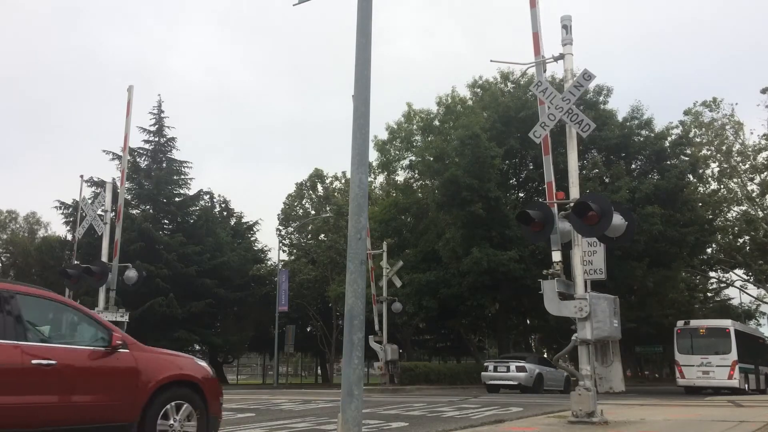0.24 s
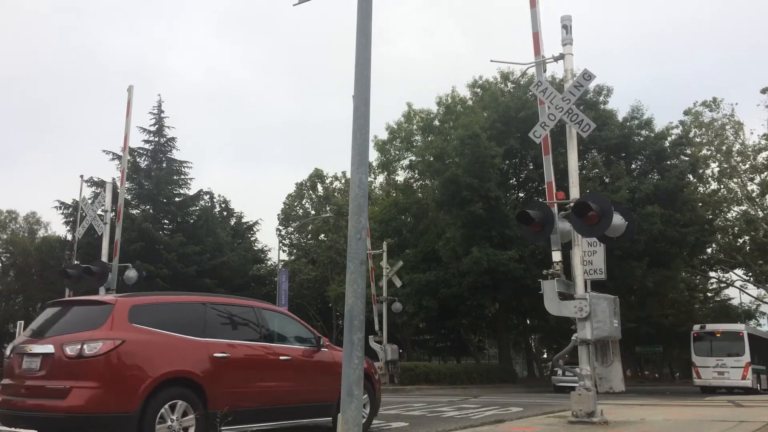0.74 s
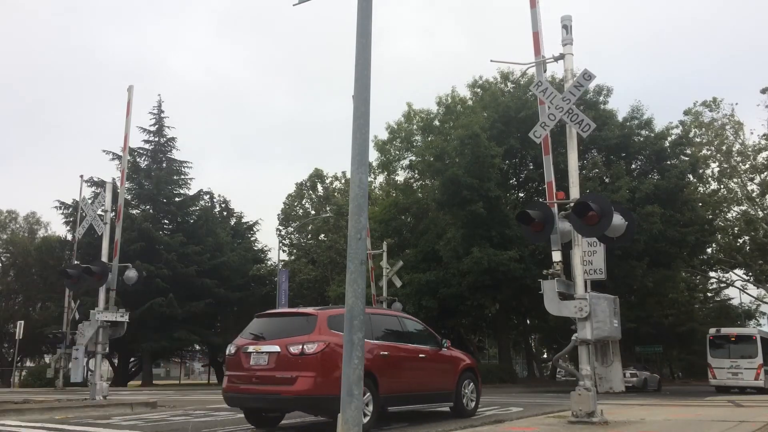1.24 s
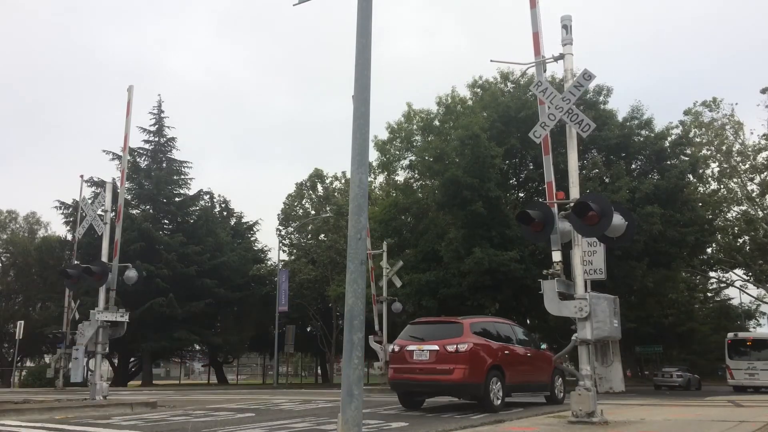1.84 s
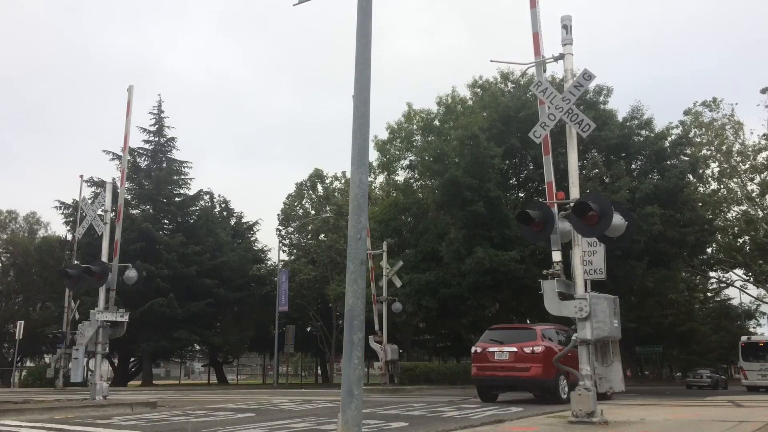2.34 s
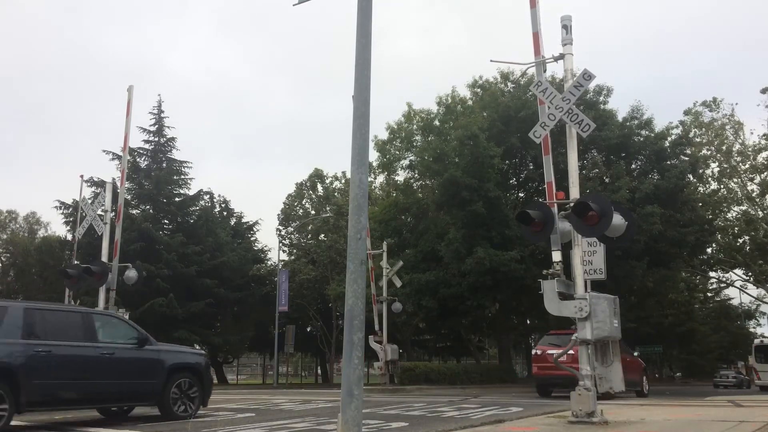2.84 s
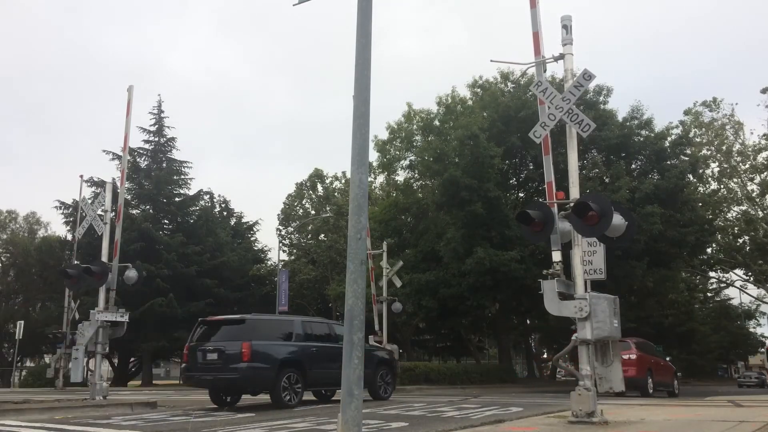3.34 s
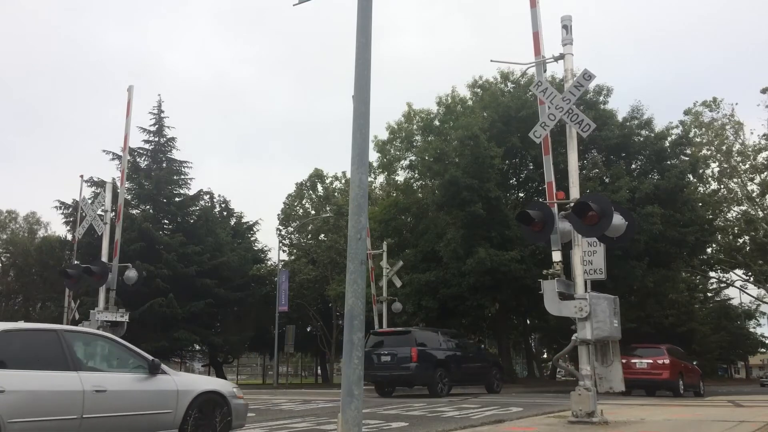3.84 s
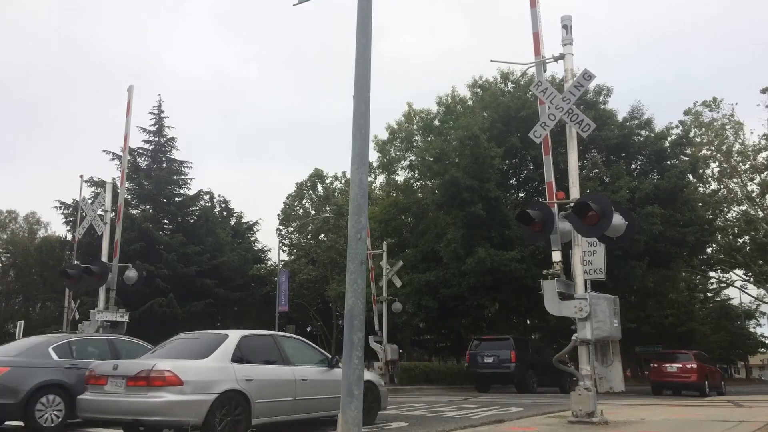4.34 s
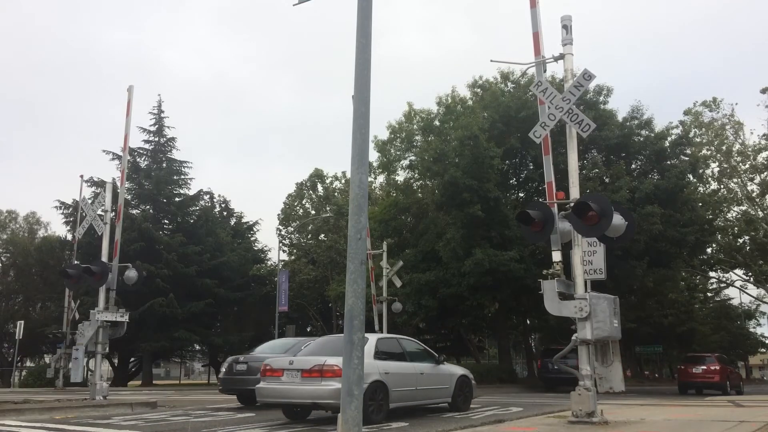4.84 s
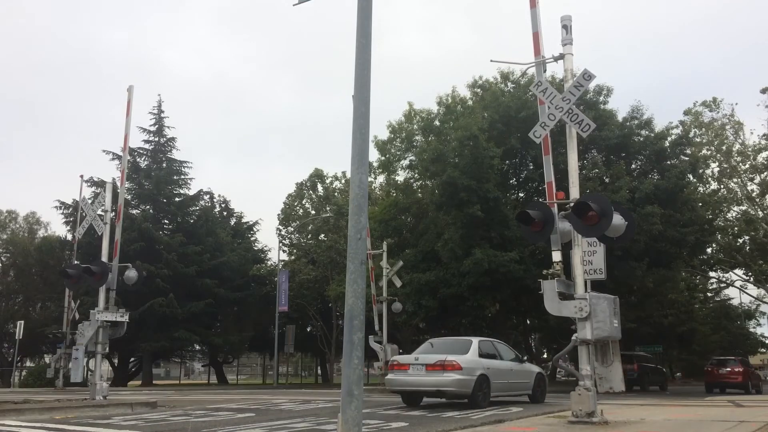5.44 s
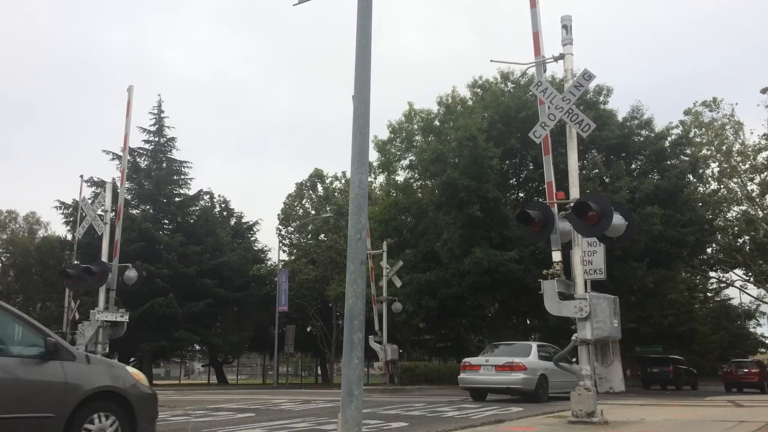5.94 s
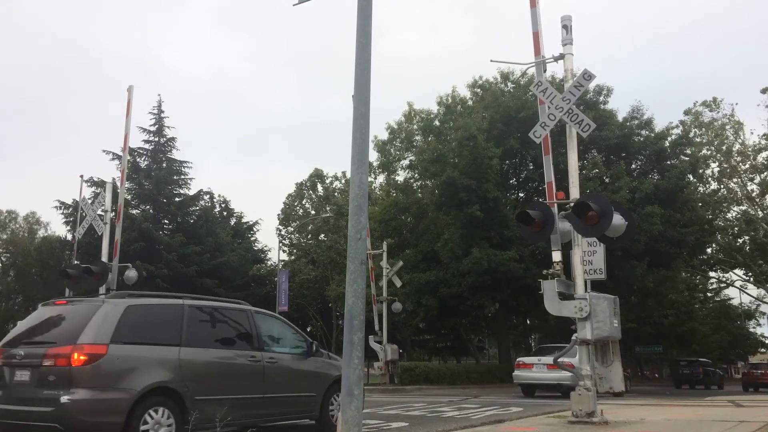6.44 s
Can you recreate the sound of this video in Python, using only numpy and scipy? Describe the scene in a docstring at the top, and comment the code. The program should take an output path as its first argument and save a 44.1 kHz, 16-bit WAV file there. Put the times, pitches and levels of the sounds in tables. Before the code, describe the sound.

Tyres roar and hiss over a low traffic rumble, picked up by a fixed mono microphone beside a town level crossing. A deep exhaust drone is loudest at first, then recedes while a quieter engine hums through a gear change. Midway, wheels bump across the rails in a cluster of dull thumps, knocks and metallic clanks as a car revs past. A few lighter bumps follow near the end.

```python
"""An eight-cylinder engine pulls away with a booming exhaust, heard at a level crossing on a town street.
A slower engine works through a gear change and a passing car revs up and eases off, each a tone at its
firing rate. Wheels thump on the rails, knock the crossing panels and shake loose metal. Behind them,
tyres roar and hiss on the road over the low rumble of traffic. One fixed microphone, mono."""
import sys
import numpy as np
from scipy import signal
from scipy.io import wavfile
from scipy.ndimage import uniform_filter1d

SR = 44100
rng = np.random.default_rng(int(sys.argv[2]) if len(sys.argv) > 2 else 0)


def to_wav(sig):
    """Store sig (one row per channel, or 1-D mono) as 16-bit WAV at the path in sys.argv[1].

    Samples outside -1..1 are clipped; the rate is SR.
    """
    pcm = np.clip(np.atleast_2d(sig), -1, 1) * 32767
    pcm = np.round(pcm).astype(np.int16)
    wavfile.write(sys.argv[1], SR, pcm.T)  # frames by channels


N = 295470


def gain_of(db):
    """Decibels to amplitude."""
    return 10 ** (np.asarray(db) / 20)


def unit_rms(x):
    """Scales to an rms of one."""
    return x / np.sqrt(np.mean(x ** 2) + 1e-20)


def curves(rows):
    """The columns after a table's time column, one value a sample."""
    times, *columns = np.transpose(rows)
    return [np.interp(np.arange(N) / SR, times, column) for column in columns]


def add(mix, start_s, sound):
    """Mixes a sound in at its start time."""
    part = mix[round(start_s * SR):][:len(sound)]
    part += sound[:len(part)]


def drift(rate_hz):
    """A slow random wander of rms one, up to the given rate."""
    knots = rng.standard_normal(1000)
    wander = np.interp(np.arange(N) * 2 * rate_hz / SR, np.arange(1000), knots)
    return unit_rms(uniform_filter1d(wander, int(SR / rate_hz / 2)))


def swell(middle_s, length_s):
    """A bell-shaped rise and fall."""
    return np.exp(-np.minimum(2 * abs(np.arange(N) / SR - middle_s) / length_s, 5) ** 2)


def band(x, hz, width_hz, second_width_hz=None):
    """Two resonances of gain one in series, equally wide unless a second width is given."""
    for width in (width_hz, second_width_hz or width_hz):
        x = signal.lfilter(*signal.iirpeak(hz, hz / width, SR), x)
    return x


# when the first, middle and last group of cars leads at the microphone: t/s
GROUP_TIMES = [0.96, 2.4, 6.4]
def traffic_noise(spectra, size, patchy_db, flicker_db):
    """Patchy, flickering noise of rms one; given several spectra, it glides from group to group."""
    frames, hz = 4 * N // size + 5, np.fft.rfftfreq(size, 1 / SR)
    real, imag, patches = rng.standard_normal((frames, len(hz), 3)).T
    patches = unit_rms(uniform_filter1d(uniform_filter1d(patches, 8, axis=0), 12, axis=1))
    flicker = unit_rms(uniform_filter1d(rng.standard_normal(frames), 5))
    t, power = np.arange(frames) * size / 4 / SR, 0
    for (knot_hz, db), lead in zip(map(np.transpose, spectra), np.eye(len(spectra))):
        colour = gain_of(2 * np.interp(np.log(hz + 1), np.log(knot_hz + 1), db, -120, -120))
        share = np.interp(t, GROUP_TIMES[:len(spectra)], lead)
        power = power + np.outer(colour / colour.mean(), share)
    bins = (real + 1j * imag) * np.sqrt(power) * gain_of(patchy_db * patches + flicker_db * flicker)
    return unit_rms(signal.istft(bins, nperseg=size, noverlap=3 * size // 4)[1][:N])


# the street at the microphone: t/s, tyre roar level/dB, tyre hiss level/dB, deep rumble level/dB
ROAD_LEVELS = [(0.0, -42, -65, -42.5), (0.26, -40.5, -61.5, -34), (0.55, -42, -62.5, -39.5),
               (0.9, -39, -59.5, -44), (1.17, -39, -59.5, -37.5), (2.33, -36, -57, -37.5),
               (2.8, -34, -56, -40), (3.6, -33.5, -56.5, -39), (3.8, -33.5, -56, -31),
               (4.22, -35, -59.5, -35), (4.66, -36.5, -59, -35), (4.93, -37, -60.5, -38),
               (5.4, -37.5, -59.5, -37), (5.76, -36.5, -59, -40), (6.1, -36, -58.5, -41),
               (6.4, -36.5, -58, -37), (6.7, -36, -59.5, -45)]
# body rumble above the tyre roar, for each group of cars: level/dB
BODY_ABOVE_ROAR = [4.5, 4.5, 5.5]
# spectra of the deep rumble and the body rumble: f/Hz, relative level/dB
DEEP_SPECTRUM = [(11, -58), (18, -31), (32, -15.5), (44, -7), (56, 0.5), (70, 4), (110, -9.5), (140, -36.5),
                 (240, -120)]
BODY_SPECTRUM = [(53, -34), (90, -1.5), (123, 3.5), (140, 0), (225, -2), (265, -6.5), (381, -14.5),
                 (432, -21), (480, -20.5), (620, -57), (1060, -120)]
# tyre spectra, one for each group of cars: f/Hz, relative level/dB
ROAR_SPECTRA = [
    [(240, -46), (400, -16), (434, -3), (545, -12), (591, -4), (749, -3), (874, -7), (964, -7),
     (1210, -12.5), (1550, -15), (2090, -22.5), (2800, -31), (3640, -52), (6160, -120)],
    [(240, -36), (400, -5.5), (519, -5), (606, -4.5), (737, 0.5), (925, -2.5), (1050, -6), (1380, -5.5),
     (1620, -7.5), (2120, -20), (2500, -20), (2800, -32), (3640, -58.5), (6160, -120)],
    [(240, -34.5), (400, -10), (430, -17.5), (511, -6.5), (668, -1.5), (839, 0), (1120, -2.5), (1280, -4),
     (1580, -6), (1940, -15.5), (2340, -17), (2800, -39.5), (3640, -60), (6160, -120)],
]
HISS_SPECTRA = [
    [(1530, -30.5), (2600, -3.5), (2930, -6.5), (3180, -7), (3330, -7.5), (3610, -3.5), (4100, -5.5),
     (4420, -4), (5090, -8), (5650, -17), (6760, -15), (9820, -22.5), (10500, -24.5), (15500, -32.5)],
    [(1530, -28.5), (2600, -7), (2930, -5.5), (3380, -3), (3780, -7.5), (4350, -7), (5820, -15.5),
     (8330, -22.5), (9250, -22.5), (10400, -29), (13600, -31.5), (15500, -41.5)],
    [(1530, -32), (2600, -3), (2800, -2), (3130, -3), (3830, -2), (4320, -5.5), (6420, -16), (15500, -27.5)],
]
def road():
    """The bed of the street: engines and bodies rumble, tyres roar and hiss as the cars go by."""
    roar_db, hiss_db, deep_db = curves(ROAD_LEVELS)
    body_db = roar_db + np.interp(np.arange(N) / SR, GROUP_TIMES, BODY_ABOVE_ROAR)
    deep = gain_of(deep_db) * traffic_noise([DEEP_SPECTRUM], size=4096, patchy_db=2, flicker_db=-1)
    body = gain_of(body_db) * traffic_noise([BODY_SPECTRUM], size=2048, patchy_db=0.5, flicker_db=1.67)
    roar = gain_of(roar_db) * traffic_noise(ROAR_SPECTRA, size=1024, patchy_db=0.89, flicker_db=0.42)
    hiss = gain_of(hiss_db) * traffic_noise(HISS_SPECTRA, size=512, patchy_db=0.9, flicker_db=0.56)
    return deep + body + roar + hiss


def grit(ticks_per_s=25):
    """Small stones tick under the tyres, a few louder than the rest."""
    strength = gain_of(4.5 * np.minimum(rng.exponential(1, N), 4))
    ticks = strength * (rng.random(N) < ticks_per_s / SR)
    return gain_of(-65.5) * band(ticks, hz=12500, width_hz=6000)


# faint squeaks and narrow swells in the treble: middle t/s, length/s, f/Hz, level/dB
SQUEAK_SWELLS = [(0.134, 0.37, 6580, -77), (0.803, .2, 6900, -81), (0.953, 0.028, 5266, -62.5),
                 (1.301, 0.51, 8230, -79.5), (1.448, 0.082, 3000, -59), (1.479, 0.058, 5070, -67),
                 (3.3, .4, 9017, -77), (5.4, 0.57, 3800, -65.5), (6.377, 0.052, 2837, -57)]
def squeaks():
    """Narrow bands of noise swell and fade above the tyres."""
    noise = rng.standard_normal(N)
    return sum(gain_of(db) * swell(s, length) * unit_rms(band(noise, hz, width_hz=0.09 * hz))
               for s, length, hz, db in SQUEAK_SWELLS)


# brief hums in the traffic: middle t/s, length/s, f/Hz, peak level/dB
TRAFFIC_HUMS = [(0.05, 0.51, 117.7, -24.5), (0.298, 0.22, 85, -34.5), (1.395, 0.93, 108.2, -34.5),
                (1.8, 0.53, 105, -33), (2.2, 0.77, 116, -33.5), (2.901, 0.41, 120.6, -34.5),
                (4.0, 0.51, 61, -34), (5.65, 0.28, 63.2, -34), (6.0, 0.39, 117.6, -45),
                (6.383, 0.31, 177, -31.5)]
def hums():
    """Low tones swell out of the traffic and sink back, their pitch wavering."""
    wavering_time = np.cumsum(1 + 0.0073 * drift(30)) / SR
    return sum(gain_of(db) * swell(s, length) * np.sin(2 * np.pi * (hz * wavering_time + phase))
               for (s, length, hz, db), phase in zip(TRAFFIC_HUMS, rng.random(len(TRAFFIC_HUMS))))


# bumps that shake loose metal: t/s, fizz level/dB, clank level/dB
RATTLE_HITS = [(1.17, -62, -60), (2.044, -57, -52), (2.837, -60.5, -58), (3.054, -62, -50),
               (3.875, -58, -62), (4.055, -57, -55), (4.151, -52, -36), (4.236, -62, -37),
               (4.566, -51, -45), (4.66, -58, -56), (6.49, -59, -58)]
# resonances of the metal: f/Hz, width/Hz, relative level/dB
METAL_MODES = [(1600, 350, -2), (2000, 300, 0), (2310, 250, -2), (5400, 500, -22)]
def rattles(rise_s=0.004, t60_s=0.15):
    """Loose metal rattles: a short burst of noise, as bright fizz and as a resonant clank."""
    out, t = np.zeros(N), np.arange(SR // 4) / SR
    envelope = (1 - np.exp(-t / rise_s)) * gain_of(-60 * t / t60_s)
    for s, fizz_db, clank_db in RATTLE_HITS:
        burst = rng.standard_normal(len(t))
        fizz = band(burst, hz=6500, width_hz=6000, second_width_hz=7000)
        clank = sum(gain_of(db) * band(burst, hz, width, 2 * width) for hz, width, db in METAL_MODES)
        add(out, s, envelope * (gain_of(fizz_db) * fizz + gain_of(clank_db) * unit_rms(clank)))
    return out


# wheels striking the crossing panels: t/s, level/dB, tilt about 700 Hz/(dB per octave)
PANEL_HITS = [(.853, -30, 0), (2.776, -22.5, -16), (2.834, -26, -10), (2.853, -21.5, 10),
              (3.053, -22.5, -5), (3.128, -26, 8), (3.427, -28, 5), (4.482, -29, 5), (6.42, -30, 0)]
# modes of a panel: f/Hz, relative level/dB, t60/s
PANEL_MODES = [(625, 0, .07), (780, 0, .06), (900, -10, .05), (1030, -11, .05), (385, -22, .12)]
def panel_knocks(rise_s=0.002):
    """Each wheel rings the same panel modes, a little detuned."""
    out, t = np.zeros(N), np.arange(SR // 5) / SR
    for s, hit_db, tilt_db in PANEL_HITS:
        ring = 0
        for hz, mode_db, t60 in PANEL_MODES:
            envelope = gain_of(mode_db + tilt_db * np.log2(hz / 700) - 60 * t / t60)
            ring += envelope * np.sin(2 * np.pi * hz * rng.uniform(0.96, 1.03) * t)
        add(out, s, gain_of(hit_db) * (1 - np.exp(-t / rise_s)) * ring)
    return out


# wheels crossing the rails: t/s, peak level/dB, f/Hz, length/s
RAIL_HITS = [(2.349, -25, 158, .027), (2.81, -21.5, 89.5, 0.024), (3.107, -17.5, 86.2, .03),
             (3.155, -18, 91.5, 0.028), (3.423, -20.5, 80.9, 0.03), (3.7, -29.5, 325.8, 0.028),
             (3.829, -22.5, 81.1, 0.039), (3.975, -14, 76, 0.017), (3.986, -14, 271, 0.0095),
             (4.091, -18, 172, 0.0181), (4.319, -15, 129.5, 0.012), (4.43, -23, 100.7, .026),
             (4.606, -19, 90.3, .025), (4.644, -17, 101.3, 0.019), (4.937, -24, 76, 0.043),
             (5.299, -18, 85.8, 0.02), (5.44, -27, 240, 0.016), (5.515, -26, 70, 0.033),
             (5.947, -34, 299, 0.018), (6.423, -30.5, 342.8, 0.02), (6.495, -21.5, 93.3, 0.026)]
def rail_thumps():
    """A rail shakes tyre and body for a few cycles under a smooth swell."""
    out = np.zeros(N)
    for s, db, hz, length in RAIL_HITS:
        t = np.arange(0, length, 1 / SR)
        add(out, s, gain_of(db) * np.sin(np.pi * t / length) * np.sin(2 * np.pi * hz * t))
    return out


# slower engine climbing, changing gear, climbing again: t/s, firing f/Hz, level/dB
GEAR_CHANGE = [(0.0, 79.7, -48), (0.8, 76.72, -42), (1.6, 80.83, -45), (2.0, 83.37, -31), (2.2, 86.73, -39),
               (2.5, 89.7, -28.5), (2.8, 87.73, -34), (3.15, 66.9, -35), (3.4, 65.6, -36),
               (4.0, 80.33, -38), (4.3, 80.7, -37.5), (4.6, 84.23, -30), (4.85, 84.27, -42), (5.4, 81, -45),
               (5.7, 78.5, -35.5), (6.0, 81.66, -46), (6.2, 82.6, -40), (6.7, 83, -44)]
# car passing the microphone, revving up and easing off: t/s, firing f/Hz, level/dB
PASS_BY = [(3.85, 118.4, -63), (4.02, 124.3, -31.5), (4.18, 134.1, -31), (4.3, 149.8, -36),
           (4.42, 154.2, -36), (4.6, 145.8, -36), (4.8, 137.8, -30.5), (5.0, 131.5, -30.5),
           (5.2, 120.5, -35.5), (5.4, 116, -68)]
def small_engine(rows, overtone_db, undertone_db):
    """Firings make a rough low tone, with weak tones an octave above and below."""
    firing_hz, level_db = curves(rows)
    phase = 2 * np.pi * np.cumsum(firing_hz * (1 + 0.0087 * drift(8))) / SR
    tone = np.sin(phase) + gain_of(overtone_db) * np.sin(2 * phase)
    tone += gain_of(undertone_db) * np.sin(phase / 2)
    return np.sqrt(2) * gain_of(level_db + 0.65 * drift(15)) * tone


# eight-cylinder engine drawing away from the microphone: t/s, firing f/Hz, boom level/dB
PULL_AWAY = [(0.0, 142.6, -17), (0.12, 143.1, -16.5), (0.26, 144.9, -14.5), (0.5, 148.1, -15.5),
             (0.64, 150.4, -20.5), (0.76, 152.6, -18), (0.88, 155.0, -23.5), (1.02, 155.2, -19),
             (1.14, 157.5, -22), (1.5, 160.7, -22), (1.65, 163.4, -25.5), (1.88, 164.6, -27),
             (2.2, 168.3, -33), (2.6, 169.9, -33.5), (3.2, 174.4, -38.5), (3.6, 175.2, -35),
             (3.9, 173.8, -49), (4.3, 173, -72)]
# burble of the uneven cylinders: order of the engine cycle, relative level/dB
BURBLE_ORDERS = [(4, 4), (6, 0.5), (9, 2.5), (10, -1), (11, -7), (12, -4.5), (14, -4), (15, -2), (16, -7),
                 (17, -5), (19, -9), (21, -15), (23, -13.5), (24, -9.5), (26, -12.5), (32, -10)]
# exhaust pipe resonances: f/Hz, width/Hz, boost/dB
EXHAUST_MODES = [(266.7, 37, 6.5), (339.7, 18, 6)]
def eight_cylinder_engine(burble_db=-46, recede_s=1.14, recede_db_per_s=-3.5):
    """The exhaust booms at the firing rate; uneven cylinders add other orders, which the pipe lifts."""
    firing_hz, boom_db = curves(PULL_AWAY)
    cycle_hz = firing_hz / 8  # eight firings a cycle
    phase = 2 * np.pi * np.cumsum(cycle_hz * (1 + 0.0023 * drift(6))) / SR
    out = gain_of(boom_db + drift(6)) * np.sin(8 * phase)
    # drone and burble hold, then fade with distance
    distance_db = recede_db_per_s * np.maximum(np.arange(N) / SR - recede_s, 0)
    # order 13 drones as it crosses a sharp pipe resonance (width at -6 dB)
    drone_hz, drone_width_hz, drone_db = 266.5, 18, -28.5
    off_peak_db = -6 * (2 * (13 * cycle_hz - drone_hz) / drone_width_hz) ** 2
    out += gain_of(drone_db + off_peak_db + distance_db) * np.sin(13 * phase)
    for order, order_db in BURBLE_ORDERS:
        pipe_db = sum(boost / (1 + (2 * (order * cycle_hz - hz) / width) ** 2)
                      for hz, width, boost in EXHAUST_MODES)
        level_db = burble_db + distance_db + order_db + pipe_db + 3 * drift(3)
        out += gain_of(level_db) * np.sin(order * phase + 2 * np.pi * rng.random())
    return np.sqrt(2) * out


def scene():
    """Engines, crossing and street meet at one microphone."""
    engines = eight_cylinder_engine()
    engines += small_engine(GEAR_CHANGE, overtone_db=-12.5, undertone_db=-12.5) + hums()
    engines += small_engine(PASS_BY, overtone_db=-17.5, undertone_db=-18.5)
    crossing = rail_thumps() + panel_knocks() + rattles()
    street = road() + grit() + squeaks()
    return (engines + crossing + street)[None]


def record(dry):
    """The recorder cuts the treble above its band limit."""
    limit_hz = 15700
    lowpass = signal.firwin(1023, limit_hz, window=("kaiser", 9), fs=SR)
    return signal.oaconvolve(dry, lowpass[None], "same")


dry = scene()
out = record(dry)
to_wav(out)
```